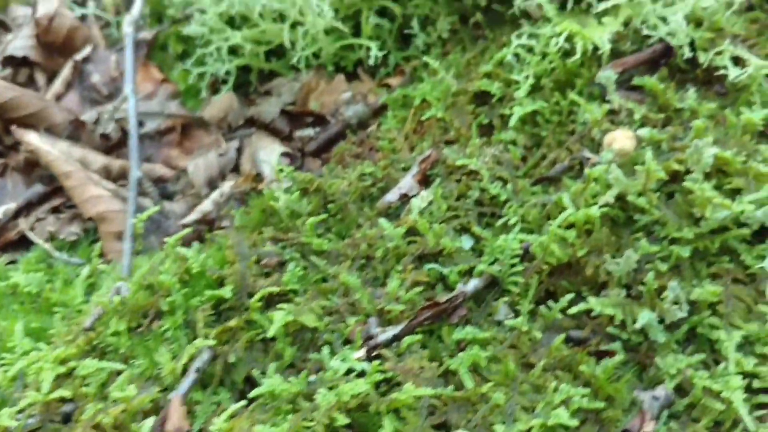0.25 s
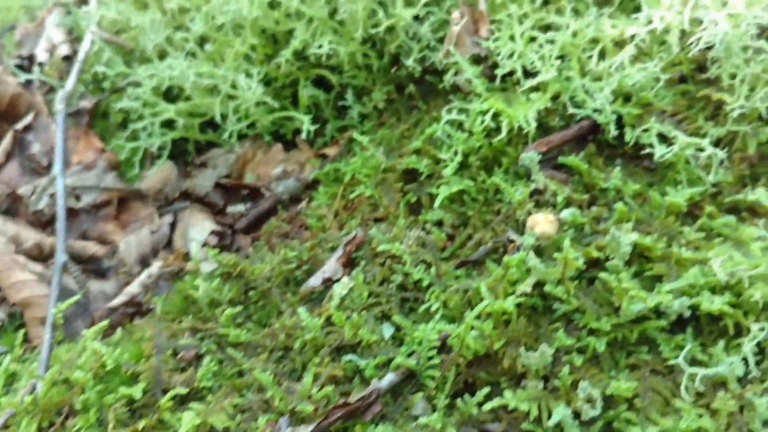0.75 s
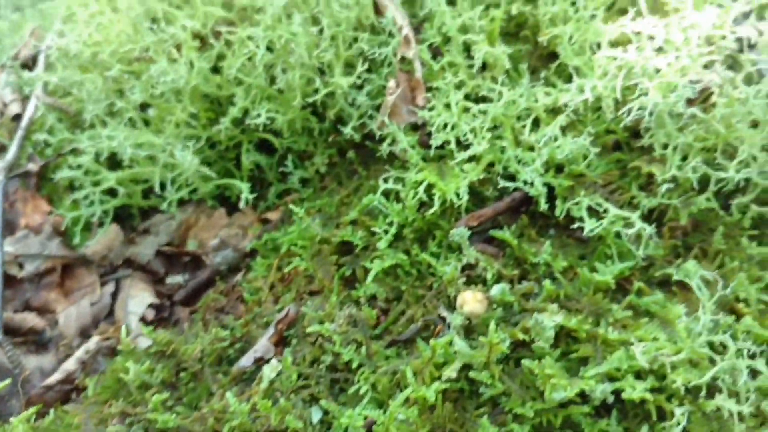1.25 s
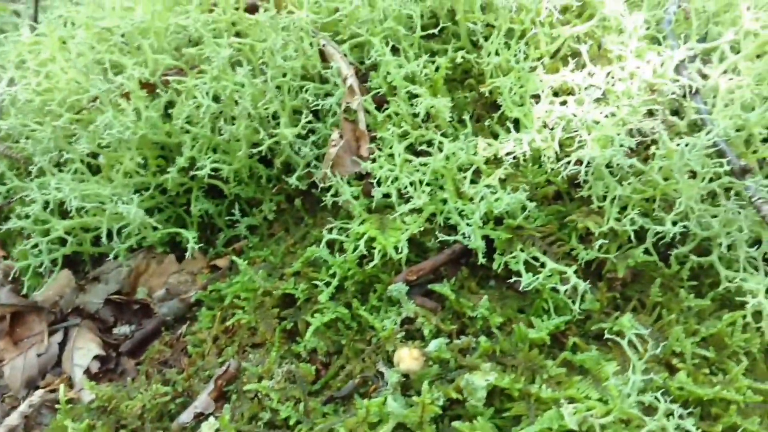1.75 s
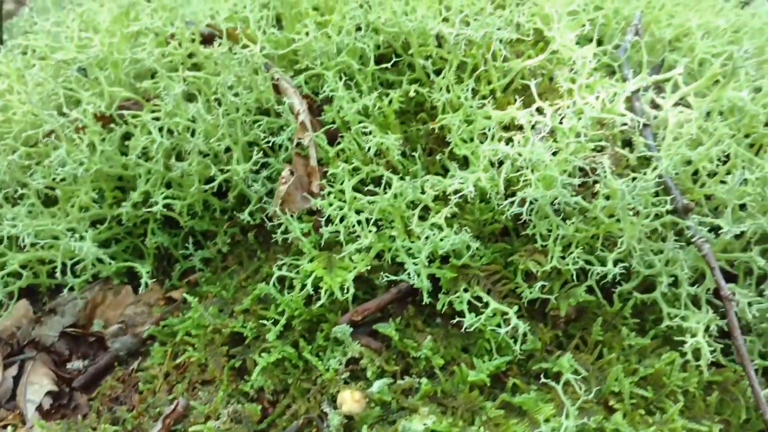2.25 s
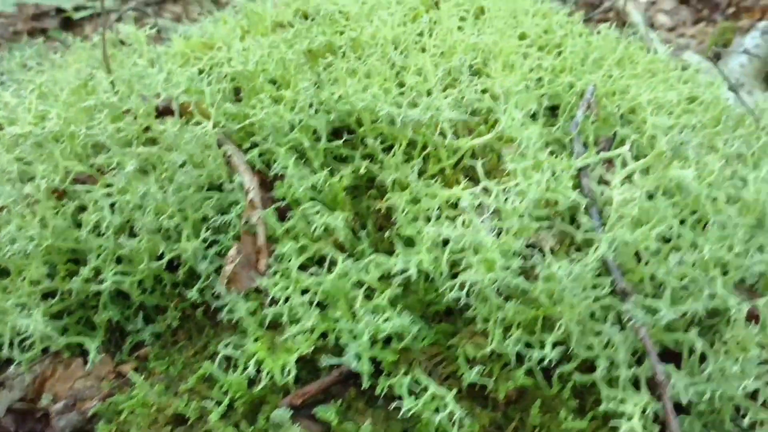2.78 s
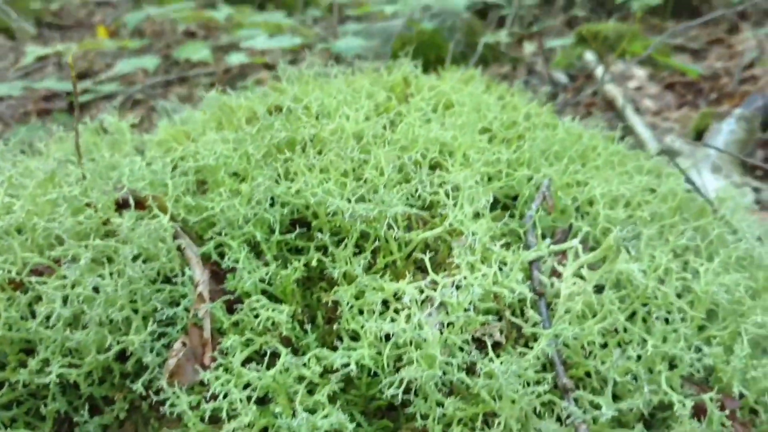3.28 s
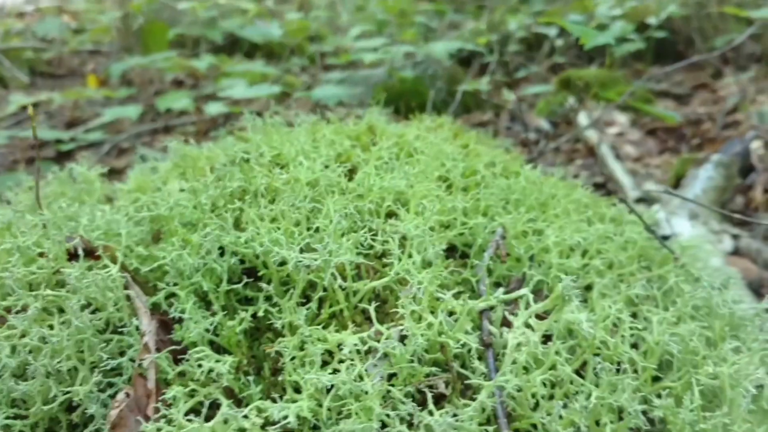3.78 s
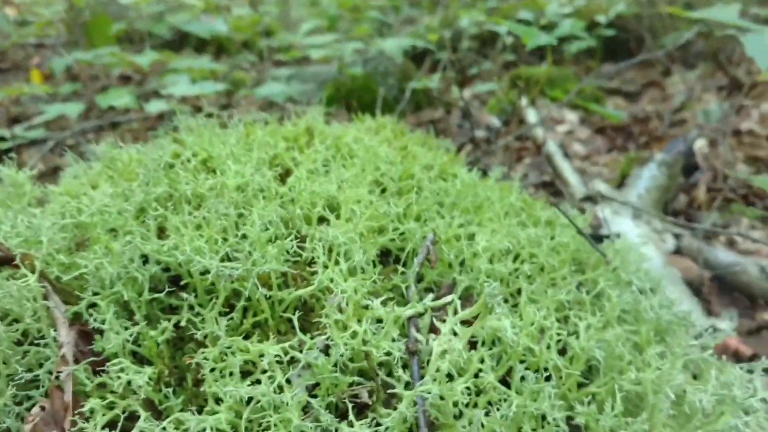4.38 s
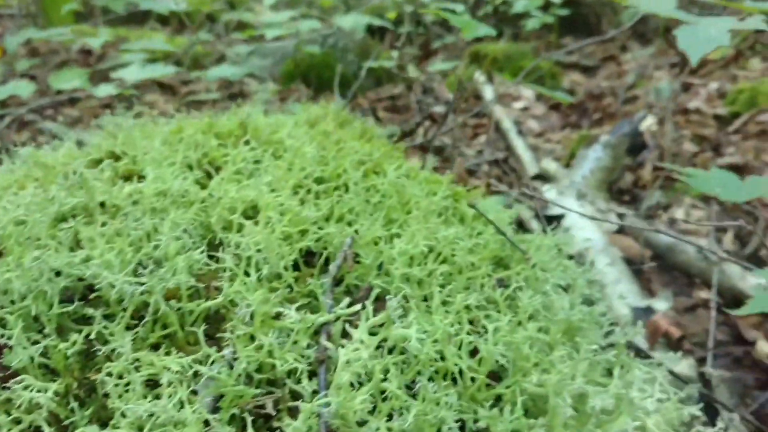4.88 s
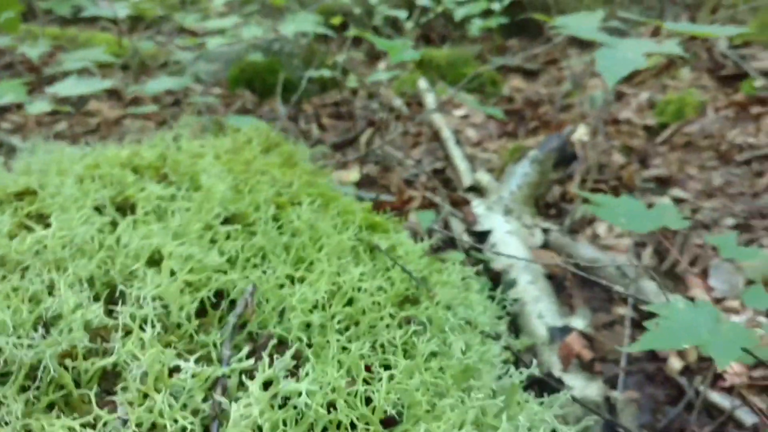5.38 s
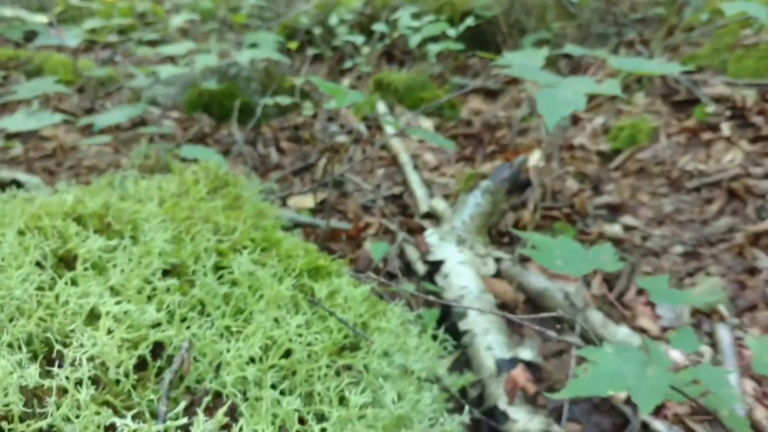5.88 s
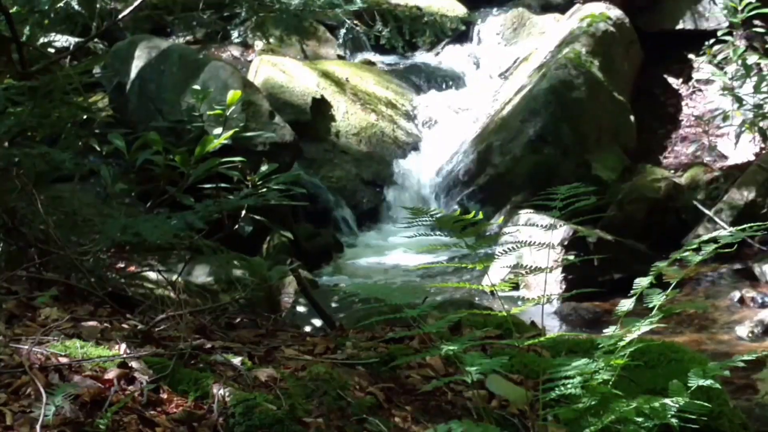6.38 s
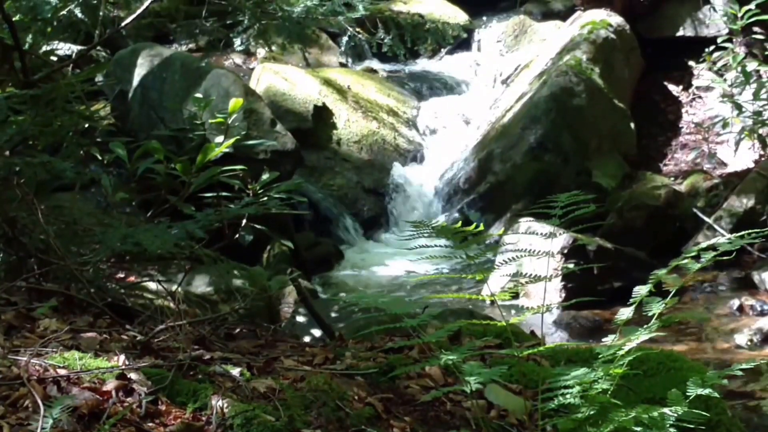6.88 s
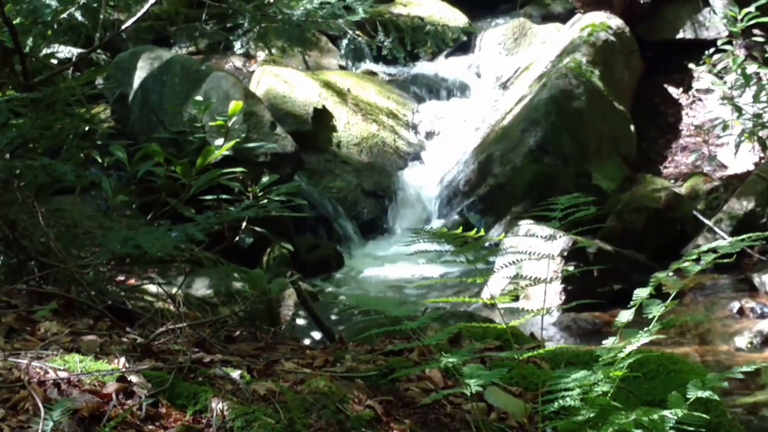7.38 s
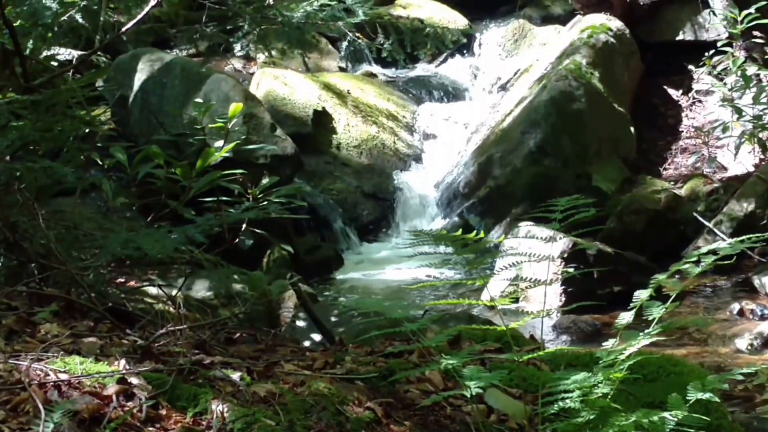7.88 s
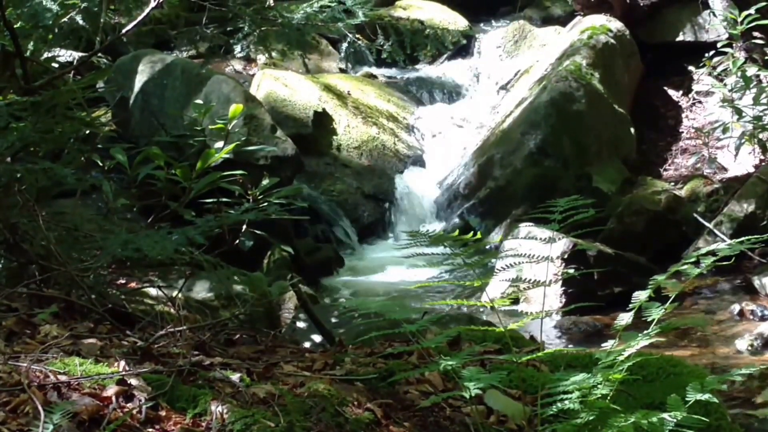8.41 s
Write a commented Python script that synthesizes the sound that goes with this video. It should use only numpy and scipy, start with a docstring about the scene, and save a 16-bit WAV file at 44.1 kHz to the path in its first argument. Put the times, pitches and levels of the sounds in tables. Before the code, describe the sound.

From 0 to about 6.2 seconds a distant forest stream rushes quietly and steadily: a soft, wide, slightly hollow hiss with a little low body, growing marginally airier. One faint bump comes at 2.9 seconds. From about 4.1 seconds a low grip rumble rises, and between 4.8 and 6.1 seconds dull thuds, short knocks and muffled finger rubs come in irregular clusters, mostly on the right. At 6.24 the rush cuts off abruptly, leaving about a tenth of a second of silence. From 6.35 a close cascade fades in within a third of a second, far louder: dense, patchy white-water hiss over a full low-mid churn. Hollow gulps and plunks ring briefly with rising pitch, busiest around 7.2 to 7.45, with occasional higher bubble blips. The flow dips near 7.6, continues while its spray brightens slightly, and ends quickly around 8.6.

```python
"""Forest stream, far then near

A distant stream rushes steadily while the hand-held camera bumps softly; it stops short.
After a short silence a close cascade fades in: white water hisses over boulders and gulps in its pool.
Water is patchy spray noise plus bubble swarms; gulps, plunks and bumps are damped oscillations.
Two closely spaced microphones feed a stereo widener."""
import sys
import numpy as np
from scipy import signal
from scipy.fft import rfft, irfft
from scipy.io import wavfile
from scipy.ndimage import uniform_filter1d

SR = 44100
rng = np.random.default_rng(int(sys.argv[2]) if len(sys.argv) > 2 else 0)


def bounce(signal):
    """Save signal as a 16-bit WAV file at the path given by the first command-line argument."""
    frames = np.transpose(np.atleast_2d(signal))
    limited = np.clip(frames, -1, 1)
    pcm = np.round(limited * 32767).astype(np.int16)
    wavfile.write(sys.argv[1], SR, pcm)


N = 381465
T, HZ = np.arange(N) / SR, np.fft.rfftfreq(N, 1 / SR)

# Spectra of the water before the pool and spray gains. Each row: frequency in Hz, level in dB per Hz.
FAR_SPECTRUM = [(25, -93), (50, -83), (80, -75), (130, -66.5), (180, -66), (300, -72.5), (600, -78),
                (950, -80), (1400, -78), (2000, -80), (3800, -80.5), (6500, -84), (9500, -89.5),
                (14800, -102)]
NEAR_SPECTRUM = [(30, -79), (80, -64), (150, -58), (225, -52), (290, -57), (470, -62), (600, -58),
                 (730, -60), (900, -63), (1250, -61.5), (1600, -62), (2400, -64), (3500, -64.5),
                 (5200, -68), (9000, -71.5), (14800, -83)]
# Stereo image of the water. Each row: frequency in Hz, channel likeness (-1..1), left minus right in dB.
FAR_STEREO = [(50, 0.9, 2), (170, 0.92, 2), (400, 0.78, 0), (693, 0.69, 8), (970, 0.28, -6.5),
              (1630, -0.43, 3.5), (2580, 0.1, 5), (5000, -0.045, 1.8)]
NEAR_STEREO = [(60, 0.87, 1.3), (230, 0.98, 1.3), (390, 0.88, 2), (600, 1, 2.4), (780, 0.89, 3.5),
               (1050, 0.84, 1.5), (1400, 0.44, .3), (1790, 0.34, 1), (2420, 0.19, 1.4), (5050, 0.38, 1.9),
               (10000, 0.027, 2.4)]
# Bumps of the hand on the camera. Each row: start in seconds, thud level in dB, thud pitch in Hz,
# knock level in dB, knock pitch in Hz.
HAND_BUMPS = [(2.91, -39, 130, -38, 220), (4.8299, -27, 115, -25, 260), (4.874, -37, 135, -31, 220),
              (4.945, -32, 130, -34, 240), (5.104, -28, 110, -26, 235), (5.356, -40, 190, -26, 290),
              (5.3645, -29, 170, -24, 290), (5.5899, -29, 125, -20.5, 240), (5.613, -34, 130, -29, 230),
              (5.741, -29, 130, -39, 260), (6.057, -37, 210, -30, 240), (6.066, -24.5, 128, -36, 260)]
# Fingers sliding on the case. Each row: middle in seconds, width at half height in seconds, level in dB.
FINGER_RUBS = [(2.97, 0.06, -48), (4.78, .14, -44), (4.91, 0.13, -40), (5.47, .08, -52), (5.72, .06, -46),
               (5.85, .025, -45), (5.96, 0.058, -46), (6.2, 0.098, -47)]
# Colour of rubbing heard through the case. Each row: frequency in Hz, relative level in dB.
CASE_COLOUR = [(20, -21), (60, -2), (125, -1), (220, -7), (370, -27), (480, -14), (620, -34), (1500, -54)]
# Surges (+) and lulls (-) over the boulders. Each row: middle in seconds, width at half height in
# seconds, flow in dB.
FLOW_SURGES = [(6.758, 0.07, 2.1), (6.84, 0.2, -1.5), (7.05, 0.11, 0.35), (7.178, 0.07, 1),
               (7.54, .04, 0.4), (7.61, 0.069, -2), (8.012, 0.013, 0), (8.43, 0.06, 0.5), (8.57, 0.039, 1)]
# Air pockets collapsing in the pool. Each row: start in seconds, relative level in dB, starting pitch
# in Hz, oscillations to -60 dB, level of the smaller bubble that splits off in dB.
POOL_GULPS = [(6.45, -23, 560, 13, -50), (6.487, -17.5, 637, 22, -32), (6.705, -26, 743, 16, -38),
              (6.7917, -12.5, 620, 13, -10), (6.802, -25, 724, 12, -20), (6.8964, -14.5, 630, 18, -40),
              (7.016, -16, 600, 22, -41), (7.023, -19, 690, 16, -35), (7.168, -17, 630, 18, -40),
              (7.184, -26, 610, 26, -19), (7.1955, -12.5, 700, 26, -37), (7.2005, -11.5, 650, 18, -28),
              (7.211, -18, 575, 40, -23), (7.234, -18, 770, 16, -38), (7.3115, -18, 700, 22, -27),
              (7.361, -22, 670, 18, -38), (7.392, -16.5, 600, 26, -32), (7.417, -13.5, 600, 19, -38),
              (7.424, -14, 710, 12, -40), (7.4365, -18, 610, 16, -40), (7.4445, -20, 630, 20, -40),
              (7.553, -21, 606, 20, -24), (7.601, -22, 700, 19, -40), (7.679, -21.5, 780, 22, -33),
              (7.72, -22, 620, 16, -38), (7.798, -19, 660, 12, -32), (8.002, -16, 696, 10, -21),
              (8.0098, -15.5, 800, 9.7, -26), (8.018, -29, 620, 11, -20), (8.243, -23, 690, 23, -40),
              (8.343, -20.5, 594, 25, -38), (8.389, -28, 710, 12, -29), (8.493, -24, 764, 14, -38),
              (8.506, -22.5, 754, 22, -38)]
# Small bubbles bursting singly near the bank. Each row: start in seconds, level in dB, starting pitch in Hz.
BANK_BLIPS = [(6.641, -27, 1320), (6.883, -26.5, 1320), (7.075, -25, 1770), (7.94, -22, 1445),
              (8.257, -28, 1600), (8.431, -25.5, 1300), (8.5702, -23, 1470)]
# Widener, opposite channel delayed and subtracted. Each row: frequency in Hz, share, delay in ms.
WIDENER = [(1300, 0.82, 0.38), (2600, 1, 0.402), (2960, 1, 0.39), (3850, 0.72, 0.39), (5100, 0.52, 0.3872),
           (6500, 0.42, 0.392), (7800, 0.39, 0.387), (9150, 0.37, 0.386), (10300, 0.43, 0.382),
           (11750, 0.62, 0.392), (13000, 0.73, 0.393)]

# as the camera turns, the low mids of the distant rush sink and its hiss grows
FAR_POOL_DB_PER_S, FAR_SPRAY_DB_PER_S = -0.44, 0.23
CUT_S, CUT_DECAY_S = 6.238, 0.004

# the grip tightens once, from a resting to a restless rumble
GRIP_S, GRIP_RISE_S, GRIP_REST_DB, GRIP_TIGHT_DB = 4.1, 0.34, -64.5, -50
THUD_T60_S, KNOCK_T60_S = 0.05, 0.0068
CASE_RING_HZ, CASE_RING_T60_S, CASE_RING_RE_KNOCK_DB = 473, 0.035, -19

FADE_IN_S, FADE_IN_LENGTH_S, FADE_IN_START_DB = 6.346, 0.32, -24
OPEN_S = 0.008
# the pool answers the flow more strongly than the spray and foams up around each gulp
POOL_DB, POOL_FOLLOWS, FOAM_DB, FOAM_S = -1.65, 1.9, 1.3, 0.18
SPRAY_DB, SPRAY_DB_PER_S = -0.7, 0.84  # level at the middle of the close view, and its growth
PLUNKS_PER_S, PLUNK_DB, PLUNK_LOW_HZ, PLUNK_HIGH_HZ, PLUNK_CYCLES = 26, -32.5, 570, 760, 31
BLIP_CYCLES = 36  # oscillations to -60 dB
EDGE_HZ = 15100


def amp(db):
    """Decibels to gain."""
    return 10 ** (np.asarray(db) / 20)


def evened(x):
    """Scales to rms 1."""
    return x / np.sqrt(np.mean(x ** 2) + 1e-20)


def over_hz(table):
    """Each column of a table along the log-frequency axis."""
    hz, *columns = np.transpose(table)
    return [np.interp(np.log(HZ + 1), np.log(hz + 1), column) for column in columns]


def hump(middle_s, width_s):
    """Smooth rise and fall to 1 and back; width at half height."""
    return np.exp2(-(2 * (T - middle_s) / width_s) ** 2)


def ramp(start_s, length_s):
    """Even rise from 0 to 1."""
    return np.clip((T - start_s) / length_s, 0, 1)


def add(mix, start_s, sound):
    """Mixes a sound in at a time."""
    part = mix[round(start_s * SR):][:len(sound)]
    part += sound[:len(part)]


def ring(hz, t60_s, rise, attack_s):
    """Damped oscillation, peak 1, soft start; pitch rises by the share `rise` over its decay."""
    t = np.arange(int(t60_s * SR) + 8) / SR
    cycles = hz * (t + rise * t ** 2 / (2 * t60_s))
    decay = np.exp(-np.log(1000) * t / t60_s)
    wave = np.sin(2 * np.pi * cycles) * decay * (1 - np.exp(-t / attack_s))
    return wave / abs(wave).max()


def splashes(patch_db, flicker_db):
    """Two streams of spray noise, with brief shared patches and a flicker common to all pitches."""
    shape = (N // 128 + 3, 257)  # frames, frequency bins
    spray = rng.standard_normal((2, *shape)) + 1j * rng.standard_normal((2, *shape))
    patches = uniform_filter1d(rng.standard_normal(shape), size=9, axis=0)
    patches = evened(uniform_filter1d(patches, size=14, axis=1))
    flicker = evened(uniform_filter1d(rng.standard_normal(shape[0]), size=7))[:, None]
    spray *= amp(patch_db * patches + flicker_db * flicker)
    streams = signal.istft(spray.swapaxes(1, 2), nperseg=512, noverlap=384)[1]
    return evened(streams[:, :N])


def bubbles(per_s, spread_db, cycles, count=28):
    """Swarm of ringing bubbles of many sizes; the small, high ones are the most numerous."""
    out = np.zeros(N)
    pitches_hz = np.geomspace(450, 12000, count)
    for hz, share in zip(pitches_hz, pitches_hz / pitches_hz.sum()):
        chance, size = rng.random(N), rng.standard_exponential(N)
        starts = np.flatnonzero(chance < per_s * share / SR)
        grain = ring(hz, cycles / hz, rise=0.045, attack_s=0.5 / hz)
        voices = amp(spread_db * np.minimum(size[starts], 4))[:, None] * grain
        places = starts[:, None] + np.arange(len(grain))
        swarm = np.bincount(places.ravel(), voices.ravel(), N)[:N]
        out += np.sqrt(share) * evened(swarm)
    return out


def water(churn, spectrum, image, levels_db, lag_ms, pool_hz, pool_octaves):
    """Colours the churn, spreads it over the microphones; pool band and spray take separate levels."""
    first, other = rfft(evened(churn))
    likeness, balance_db = over_hz(image)
    likeness = np.clip(likeness, -1, 1)
    # water off to the right reaches the left microphone later
    left = first * amp(balance_db / 2) * np.exp(-2j * np.pi * HZ * lag_ms * 1e-3)
    right = (likeness * first + np.sqrt(1 - likeness ** 2) * other) * amp(-balance_db / 2)
    pair = np.array([left, right]) * amp(over_hz(spectrum)[0]) * np.sqrt(SR / 2)
    pool = np.exp(-(np.log2((HZ + 1) / pool_hz) / pool_octaves) ** 2)
    pool_db, spray_db = levels_db
    return irfft(pair * pool, N) * amp(pool_db) + irfft(pair * (1 - pool), N) * amp(spray_db)


def distant_rush(swarm):
    """Spray with few bubbles; a narrow low-mid band and the rest drift apart in level."""
    churn = splashes(patch_db=0.86, flicker_db=-0.12) + amp(-13.5) * swarm
    levels_db = np.outer([FAR_POOL_DB_PER_S, FAR_SPRAY_DB_PER_S], T - CUT_S / 2)
    return water(churn, FAR_SPECTRUM, FAR_STEREO, levels_db, lag_ms=0, pool_hz=530, pool_octaves=0.47)


def handling(left_share=0.037):
    """Thuds, dull knocks and rubbing travel through the case, mostly to the right microphone."""
    grip = amp(GRIP_REST_DB + (GRIP_TIGHT_DB - GRIP_REST_DB) * ramp(GRIP_S, GRIP_RISE_S))
    rub_power = sum((amp(db) * hump(s, width_s)) ** 2 for s, width_s, db in FINGER_RUBS)
    noise = irfft(rfft(rng.standard_normal(N)) * amp(over_hz(CASE_COLOUR)[0]), N)
    out = np.sqrt(grip ** 2 + rub_power) * evened(noise)
    for s, thud_db, thud_hz, knock_db, knock_hz in HAND_BUMPS:
        add(out, s, amp(thud_db) * ring(thud_hz, THUD_T60_S, rise=0, attack_s=0.004))
        add(out, s, amp(knock_db) * ring(knock_hz, KNOCK_T60_S, rise=0, attack_s=0.0021))
        case_ring = ring(CASE_RING_HZ, CASE_RING_T60_S, rise=0, attack_s=0.001)
        add(out, s, amp(knock_db + CASE_RING_RE_KNOCK_DB) * case_ring)
    return np.array([left_share * out, out])


def cascade_flow():
    """Pool and spray level in dB: both follow the surges, and the pool foams with each gulp."""
    flow_db = sum(db * hump(s, width_s) for s, width_s, db in FLOW_SURGES)
    loudest_db = max(row[1] for row in POOL_GULPS)
    foam = sum(amp(db - loudest_db) * hump(s, FOAM_S) for s, db, *_ in POOL_GULPS)
    from_middle_s = T - (FADE_IN_S + T[-1]) / 2
    pool_db = POOL_DB + POOL_FOLLOWS * flow_db + FOAM_DB * np.tanh(foam)
    spray_db = SPRAY_DB + SPRAY_DB_PER_S * from_middle_s + flow_db
    return pool_db, spray_db


def cascade(swarm):
    """White water close by: patchier spray, more bubbles, a wide pool band that surges."""
    churn = splashes(patch_db=1.54, flicker_db=-0.18) + amp(-7.5) * swarm
    return water(churn, NEAR_SPECTRUM, NEAR_STEREO, cascade_flow(), lag_ms=0.18, pool_hz=885, pool_octaves=1.8)


def plunks():
    """Small air pockets ring at random times and pitches under the white water."""
    out, length_s = np.zeros(N), T[-1] - FADE_IN_S
    for when, pitch in rng.random((round(PLUNKS_PER_S * length_s), 2)):
        hz = PLUNK_LOW_HZ + (PLUNK_HIGH_HZ - PLUNK_LOW_HZ) * pitch
        plunk = ring(hz, PLUNK_CYCLES / hz, rise=0.066, attack_s=0.00078)
        add(out, FADE_IN_S + when * length_s, amp(PLUNK_DB) * plunk)
    return out


def rocks(x, t60_s, count=40):
    """Scattered early echoes from the boulders, different at each microphone."""
    echoes = np.zeros((2, SR // 10))
    for side in echoes:
        delay_s = rng.uniform(0.00331, 0.05, count)
        places = np.minimum(delay_s * SR, len(side) - 1).astype(int)
        side[places] = rng.choice([-1, 1], count) * np.exp(-np.log(1000) * delay_s / t60_s)
    return signal.oaconvolve(x[None], echoes / np.linalg.norm(echoes[0]), axes=1)[:, :N]


def gulps(big_db=-4, split_s=0.002, echo_db=-11):
    """Each air pocket rings low and sheds a smaller, higher bubble; a few small ones blip alone."""
    out = np.zeros(N)
    for s, db, hz, cycles, shed_db in POOL_GULPS:
        t60_s = cycles / hz
        add(out, s, amp(db + big_db) * ring(hz, t60_s, rise=0.055, attack_s=0.00034))
        shed = ring(2.04 * hz, 0.28 * t60_s, rise=0.11, attack_s=0.00039)
        add(out, s + split_s, amp(shed_db) * shed)
    for s, db, hz in BANK_BLIPS:
        add(out, s, amp(db) * ring(hz, BLIP_CYCLES / hz, rise=0.093, attack_s=0.0005))
    return out + amp(echo_db) * rocks(out, t60_s=0.045)


def scene():
    """The distant rush with handling, then the cascade from close by."""
    swarm = np.array([bubbles(per_s=3500, spread_db=1.5, cycles=22) for _ in range(2)])
    far = distant_rush(swarm) + handling()
    near = cascade(swarm) + plunks()
    far_view = np.exp(-np.maximum(T - CUT_S, 0) / CUT_DECAY_S)
    fade_in = np.minimum(amp(FADE_IN_START_DB) + ramp(FADE_IN_S, FADE_IN_LENGTH_S), 1)
    close_view = ramp(FADE_IN_S, OPEN_S) - ramp(T[-1] - OPEN_S, OPEN_S)  # soft at both ends
    return far * far_view + gulps() + near * fade_in * close_view


def record(dry):
    """Widener subtracts a delayed copy of the opposite channel, leaving a hollow colour; then band limit."""
    pair = rfft(dry)
    share, delay_ms = over_hz(WIDENER)
    cross = np.clip(share, 0, 1) * np.exp(-2j * np.pi * HZ * delay_ms * 1e-3)
    wide = irfft(pair - cross * pair[::-1], N)
    lowpass = signal.firwin(1023, EDGE_HZ, window=("kaiser", 9), fs=SR)
    return signal.oaconvolve(wide, lowpass[None], "same")


dry = scene()
out = record(dry)
bounce(out)
```